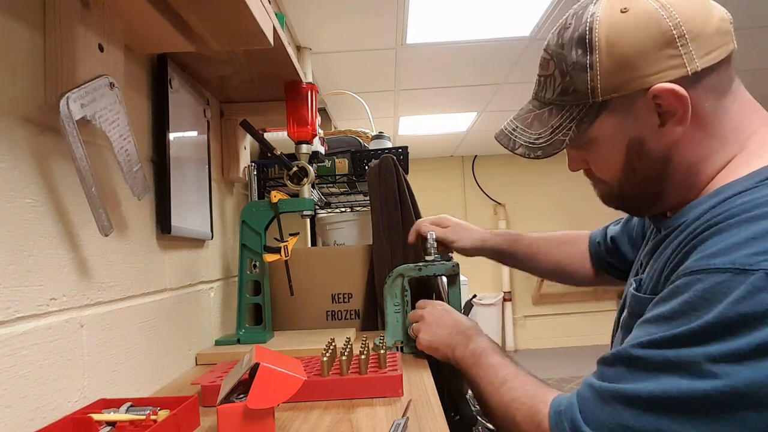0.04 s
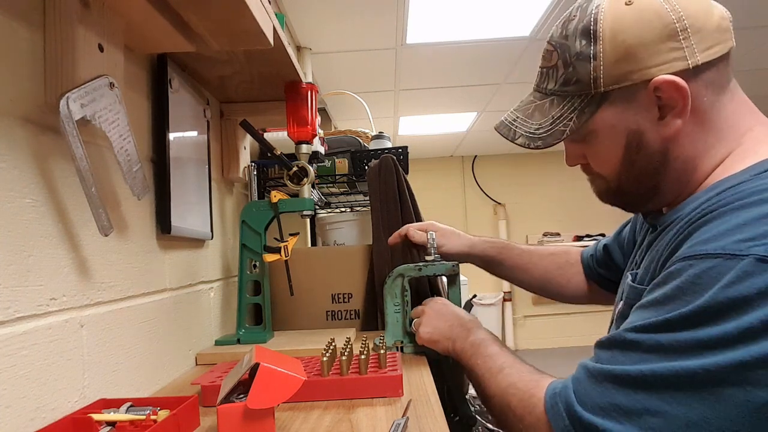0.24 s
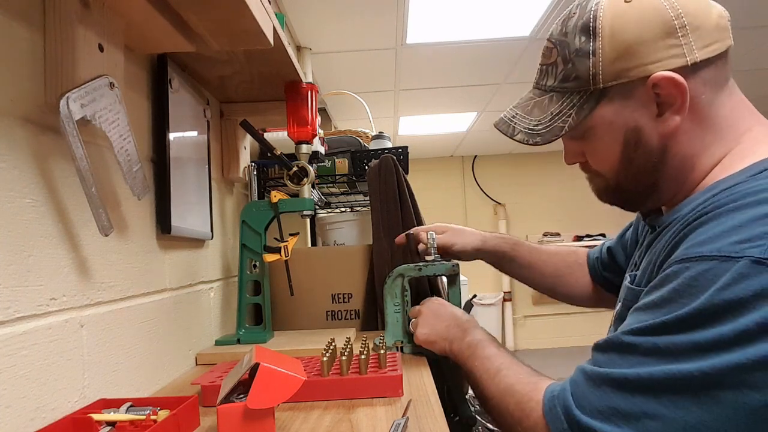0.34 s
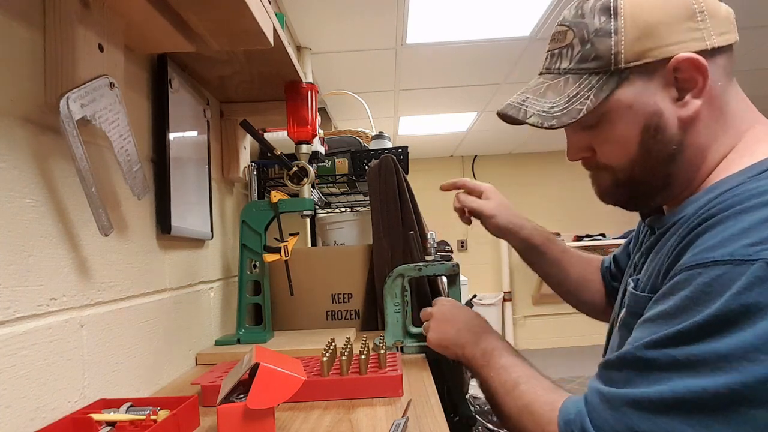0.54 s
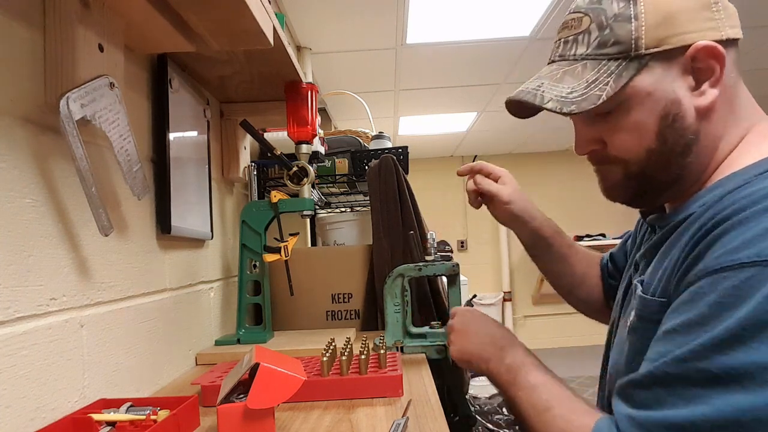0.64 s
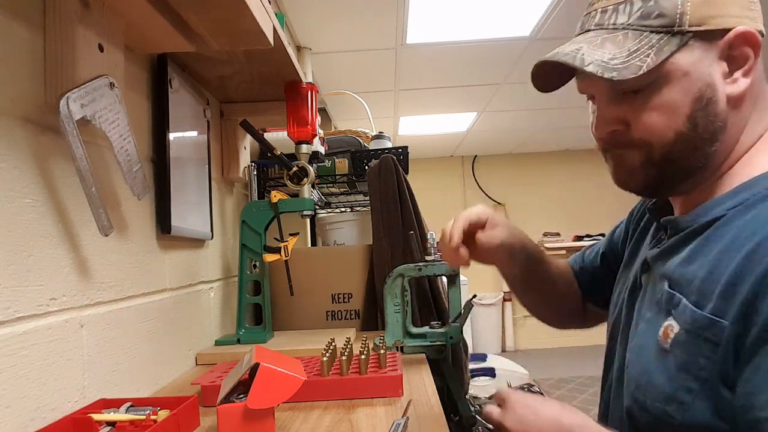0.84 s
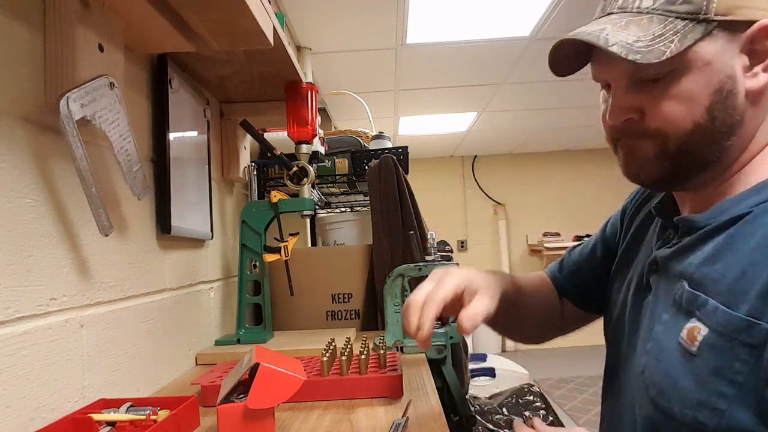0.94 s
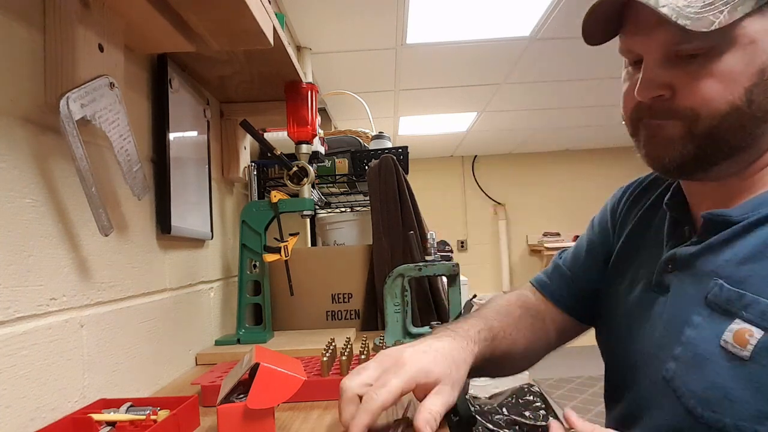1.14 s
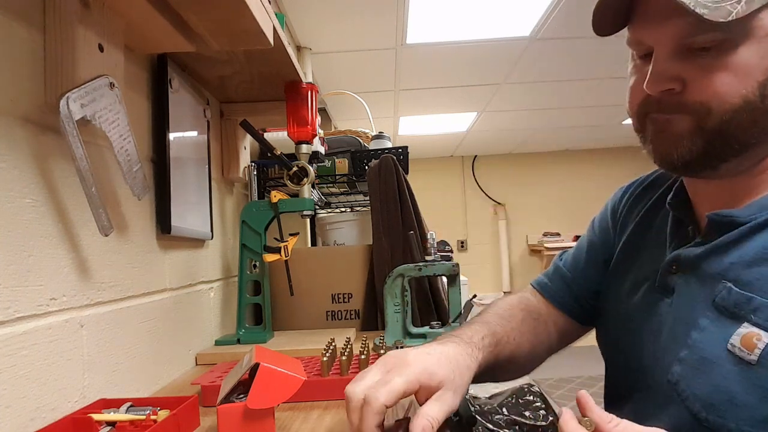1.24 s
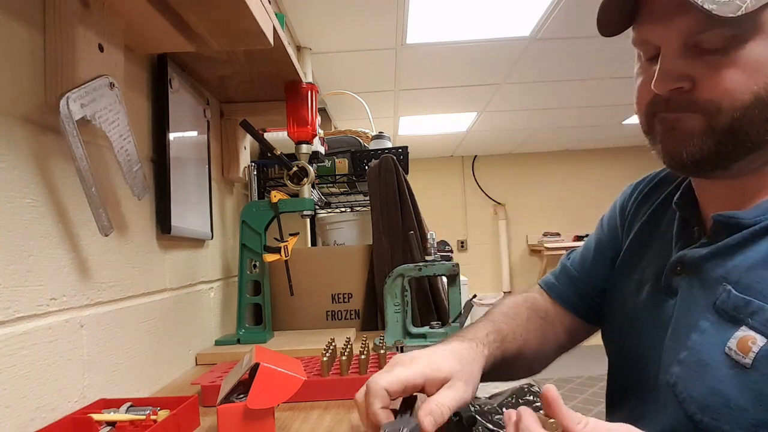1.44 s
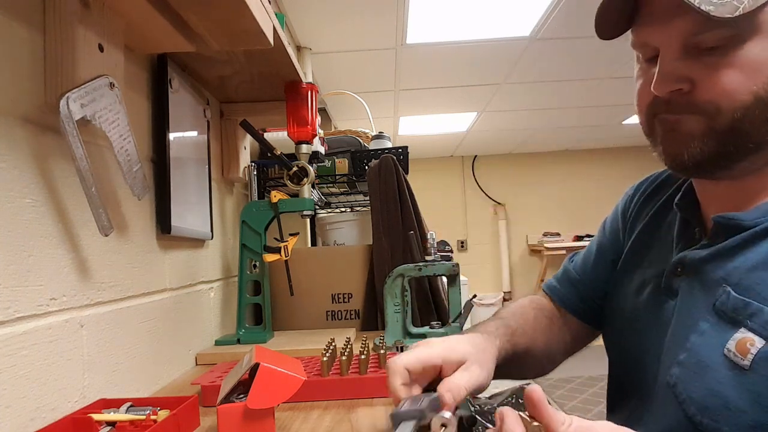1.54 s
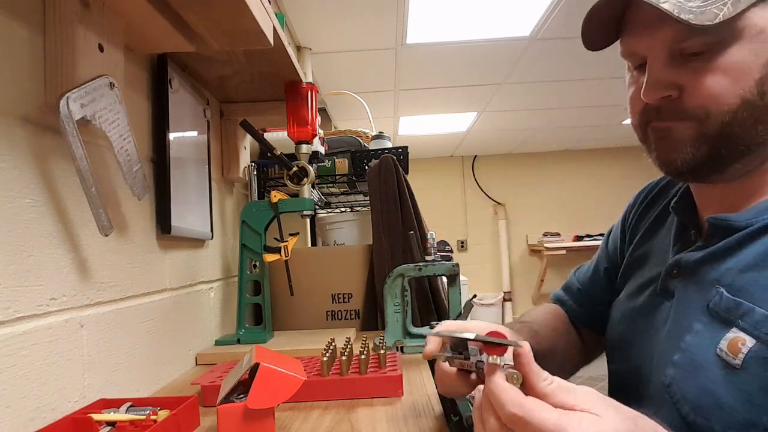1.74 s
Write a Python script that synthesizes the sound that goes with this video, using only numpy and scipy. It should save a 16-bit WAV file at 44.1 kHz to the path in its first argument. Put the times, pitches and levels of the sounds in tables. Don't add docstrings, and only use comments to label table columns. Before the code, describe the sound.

A cast-iron hand press on a wooden bench creaks briefly, clunks loudly on its stop and rattles loosely; a second later a steel tool is dragged and knocked off the wood, in a small hard room, close stereo microphone.

```python
import sys
import numpy as np
from scipy import signal
from scipy.fft import rfft, irfft, next_fast_len
from scipy.io import wavfile
from scipy.ndimage import uniform_filter1d, map_coordinates

SR = 44100
rng = np.random.default_rng(int(sys.argv[2]) if len(sys.argv) > 2 else 0)


def to_linear_factor(level_db):
    exponent = np.asarray(level_db, float) / 20
    return 10 ** exponent


def generate_wav(sig):
    pcm = np.round(np.clip(np.atleast_2d(sig).T, -1, 1) * 32767).astype(np.int16)
    wavfile.write(sys.argv[1], SR, pcm)


N = 79380

# pitch in Hz, level in dB.
HUM_LINES = [(59.2, -56.5), (91.5, -63), (183.0, -66), (269.2, -66.5)]
# frequency in Hz, level per Hz in dB.
AIR_COLOUR = [(15, -68), (25, -30), (70, -6.5), (134, -10), (285, -9), (489, -13), (988, -16),
              (1610, -23.5), (16000, -39)]
# frequency in Hz, likeness from -1 to 1.
AIR_ALIKE = [(60, 1), (240, 0.69), (950, -0.18), (3770, 0.07), (15000, 0.59)]
# frequency in Hz, time to fall by 60 dB in seconds.
ROOM_DECAY = [(150, 0.27), (1000, 0.2), (4000, 0.37), (12000, 0.17)]

# pitch in Hz, width in Hz, level in dB.
BENCH_TONES = [(93.1, 2.8, -2), (150, 9.2, -19), (170, 40, 3), (237.5, 40, 5), (327, 78, -25),
               (400, 5.4, -20)]
# time in seconds, level in dB, contact in ms.
THUMPS = [(.2148, -6.5, 3.35), (.2205, 3, 4.18), (.2335, -2.5, 1.9), (.242, -8, 1.78), (.256, -4.5, 3.8),
          (.343, -10.5, 7.2), (1.204, -22, 5.3), (1.224, -22.5, 5.1), (1.282, -27, 2.7),
          (1.300, -21.5, 5.3), (1.364, -31, 2), (1.428, -21.5, 1.52), (1.472, -14.5, 2.6),
          (1.499, -33.5, 1.4), (1.510, -24.5, 0.56)]
# start in seconds, length in seconds, level in dB, pitch in Hz.
GROAN = [(0, 0.029, -37, 231.3), (.036, 0.025, -40.5, 210.3), (.06, 0.03, -48, 195.6),
         (.09, 0.011, -45.5, 173.5), (.117, 0.011, -39.5, 170), (.143, 0.013, -41, 166),
         (.165, .011, -45.5, 163), (.195, 0.015, -41.5, 170)]
# time in seconds, level in dB.
SETTLE = [(.26, -34), (.3, -47.5), (.39, -50.5), (.43, -41.5), (.5, -56), (.6, -58)]
# time in seconds, level in dB.
DRAG = [(1.424, -42), (1.432, -33), (1.447, -41), (1.457, -30), (1.466, -39), (1.5, -23), (1.515, -21),
        (1.53, -30), (1.59, -66)]
# pitch in Hz, width in Hz, level in dB.
GROAN_WOOD = [(203, 110, 5.5), (413, 37, -2), (610, 100, -6.5)]
SETTLE_WOOD = [(223, 110, 3), (402, 54, -5.0), (602, 180, -4.5)]
DRAG_WOOD = [(132, 77, -1.5), (418.5, 64, 2.5), (590, 42, 3.0)]

# pitch in Hz, width in Hz, level in dB.
JAW_TONES = [(1300, 45, 4), (1710, 28, -8), (3030, 33, 0), (5830, 27, -2)]
# frequency in Hz, level in dB.
JAW_CROWD = [(700, -13), (3200, -23.5), (6000, -30), (10000, -40)]
# start in seconds, length in seconds, level in dB.
JAW_RATTLES = [
    (1.362, 0.035, -49.5),
    (1.404, .014, -57),
    (1.452, 0.041, -54),
]
# pitch in Hz, width in Hz, level in dB.
BEAM_TONES = [(578.5, 35, 9), (1123, 250, 10.5), (1900, 24, -19)]
# frequency in Hz, level in dB.
BEAM_CROWD = [(400, -11.5), (1300, -8), (4000, -20.5), (8000, -23.5), (15000, -32)]
# time in seconds, level in dB, contact in ms.
KNOCKS = [(1.4275, -37, 0.38), (1.438, -37, .5), (1.4735, -24, 0.58), (1.4988, -10.5, 0.18),
          (1.5025, -14, 0.18), (1.5075, -21, 0.12), (1.5155, -14.5, 0.18)]
# pitch in Hz, width in Hz, level in dB.
TING_TONES = [(1300, 60, -3), (2960, 65, 0), (3280, 120, -14), (5750, 90, -8), (7900, 150, -22),
              (8689, 120, -21)]
# time in seconds, level in dB, contact in ms.
TINGS = [(1.3615, -35, .1), (1.364, -56, 0.076), (1.367, -37, 0.031), (1.3716, -31, 0.13),
         (1.381, -41, 0.053), (1.403, -52, .04), (1.411, -42, 0.069), (1.418, -51, 0.034),
         (1.4539, -46, .02)]
# pitch in Hz, width in Hz, level in dB.
TRAY_TONES = [(680, 140, 6), (1830, 97, 2), (3460, 51, 5), (4200, 230, -1)]
# frequency in Hz, level in dB.
TRAY_CROWD = [(300, -21), (1000, -8.5), (2500, -12), (5000, -24), (8000, -26)]
# start in seconds, length in seconds, level in dB.
TRAY_RATTLES = [(1.261, 0.011, -53), (1.272, 0.0077, -49), (1.284, 0.012, -45), (1.305, 0.016, -56.5)]
# pitch in Hz, width in Hz, level in dB.
SLIDE_TONES = [(2980, 95, 3), (4950, 100, -3), (5950, 32, -3), (6830, 63, -7), (8170, 52, 9),
               (8880, 170, 7)]
# frequency in Hz, level in dB.
SLIDE_CROWD = [(1500, -23), (5500, -14), (8800, -6.5), (9600, -16), (14000, -16), (15600, -32)]
# time in seconds, level in dB, contact in ms.
CLICKS = [(1.5025, -24, 0.047), (1.5168, -16.5, 0.021), (1.5325, -18.5, 0.072), (1.541, -24, 0.052)]
# start in seconds, length in seconds, level in dB.
SLIDE_RATTLES = [(1.364, 0.034, -65), (1.404, 0.039, -65), (1.453, 0.0033, -59), (1.518, 0.0061, -35.5),
                 (1.532, .014, -40), (1.572, 0.058, -66), (1.752, 0.012, -61.5)]

# pitch in Hz, width in Hz, level in dB.
PIN_TONES = [(2150, 150, 5), (4300, 200, 3), (2750, 200, -6)]
# time in seconds, level in dB, contact in ms.
SLIPS = [(.0005, -40, .05), (.013, -55, 0.2), (.018, -46, 0.06), (.024, -48, 0.054), (.042, -51, 0.055),
         (.052, -64, 0.048), (.060, -51, 0.036), (.0707, -43, 0.037), (.0765, -51, 0.067),
         (.0892, -43, 0.036), (.111, -56, .15), (.1266, -47.5, 0.068), (.1461, -47, 0.19),
         (.1735, -57, 0.13)]
# start in seconds, length in seconds, level in dB.
PIN_RATTLES = [(0, .09, -68)]
# pitch in Hz, width in Hz, level in dB.
IRON_TONES = [(660, 44, 6), (884, 90, 15.5), (1040, 64, 13), (1374, 26, 9.5), (2185, 250, 7)]
# frequency in Hz, level in dB.
IRON_CROWD = [(350, 3), (1200, -9.5), (2300, -9.5), (5000, -15.5), (9500, -20)]
# time in seconds, level in dB, contact in ms.
CLUNKS = [(.2128, -15, 0.25), (.2152, -9.5, 0.39), (.2205, -12.5, 0.11), (.2335, -16.5, 0.29),
          (.2365, -18.5, 0.17), (.247, -34, 0.96), (.2575, -27.5, 0.18)]
# start in seconds, length in seconds, level in dB.
FRAME_RATTLES = [(.2135, 0.0035, -33), (.219, 0.015, -39.5), (.234, 0.0033, -37.5), (.248, 0.019, -51)]
# frequency in Hz, level in dB.
SNAP_CROWD = [(1800, 5), (4000, -6.5), (8000, -11), (11000, -10), (16000, -34)]
# time in seconds, level in dB, contact in ms.
SNAPS = [(.2331, -25, .02), (.2345, -29, .02), (.2365, -29, .03), (.2555, -42, .05)]
# start in seconds, length in seconds, level in dB.
SNAP_RATTLES = [
    (0, 0.086, -58.5),
    (.09, 0.13, -67),
    (.2332, 0.0044, -42),
]
# pitch in Hz, width in Hz, level in dB.
LINK_TONES = [(1402, 28, -6), (2017, 83, 3), (2293, 86, 0.5), (2970, 57, 0.5), (3400, 43, -12.5),
              (4340, 50, -1), (7100, 140, -13)]
# frequency in Hz, level in dB.
LINK_CROWD = [(600, -16), (1400, -31), (2400, -15.5), (4300, -17), (5000, -23.5), (10000, -34)]
# time in seconds, level in dB, contact in ms.
LINK_TICKS = [(.3248, -33, .04), (.328, -39, 0.032), (.3365, -36, 0.075), (.345, -50, .1),
              (.4136, -46, .04), (.418, -36, 0.058), (.4311, -51, 0.046), (.464, -40, 0.19),
              (.473, -45, .22), (.484, -54, 0.22), (.5064, -28, 0.37), (.5248, -53, 0.38), (.536, -47, .22)]
# start in seconds, length in seconds, level in dB.
LINK_RATTLES = [(.325, 0.014, -46), (.414, 0.028, -53.5)]
# start in seconds, length in seconds, level in dB.
LINK_SCRAPES = [(.36, 0.015, -65), (.463, 0.021, -47.5), (.5, .012, -51.5), (.522, 0.018, -50.5)]


def unit(x):
    return x / np.sqrt(np.mean(x ** 2) + 1e-20)


def along(points, hz):
    f, value = np.transpose(points)
    return np.interp(np.log(hz + 1), np.log(f + 1), value)


def stroke(rows):
    s, db = np.transpose(rows)
    return to_linear_factor(np.interp(np.arange(N) / SR, s, db, -120, -120))


def wander(points_per_s, count=400):
    return map_coordinates(rng.standard_normal(count), [np.arange(N) / SR * points_per_s])


def filtered(x, response):
    m = next_fast_len(N + SR // 2)
    hz = np.fft.rfftfreq(m, 1 / SR)
    return irfft(rfft(x, m) * response(hz), m)[..., :N]


def dulled(x, hz):
    return filtered(x, lambda f: (1 / (1 + 1.4j * f / hz - (f / hz) ** 2)) ** 2)


def placed(x, pan_db, lag_s):
    side = np.array([[1], [-1]])
    return filtered(x * to_linear_factor(pan_db / 2 * side), lambda f: np.exp(-1j * np.pi * f * lag_s * side))


def ring(modes, spread_db, crowd=None, loss=0.03, count=240, rise_s=1e-6):
    hz, width, db = np.transpose(modes)
    phase = np.zeros((2, len(hz)))
    if crowd:
        f = np.exp(rng.uniform(*np.log([crowd[0][0], crowd[-1][0]]), count))
        hz = np.r_[hz, f]
        width = np.r_[width, loss * f + 45]
        db = np.r_[db, along(crowd, f) + rng.normal(0, 3, count)]
        crowd_phase = rng.normal(0, .8, (2, count)) + rng.uniform(0, 2 * np.pi, count)
        phase = np.c_[phase, crowd_phase]
    t = np.arange(SR // 16 if crowd else SR // 8)[:, None, None] / SR
    left_right_db = np.outer([1, -1], min(spread_db, 3) * rng.standard_normal(len(hz)))
    size = to_linear_factor(db + left_right_db) * width
    fade = np.exp(-np.pi * width * t) * (1 - np.exp(-t / rise_s))
    return (size * fade * np.sin(2 * np.pi * hz * t + phase)).sum(2).T


def body(force, tick, order):
    answer = tick / np.linalg.norm(tick, order, axis=1).mean()
    return signal.fftconvolve(force[None], answer, axes=1)[:, :N]


def blows(rows):
    t = np.arange(N) / SR
    force = np.zeros(N)
    for s, db, ms in rows:
        pulse = np.exp(-.5 * ((t - s - ms / 2000) / (ms / 4000 + 1e-6)) ** 2)
        force += to_linear_factor(db) * pulse / pulse.sum()
    return force


def struck(rows, tick):
    return body(blows(rows), tick, np.inf)


def rattle(rows, tick, tail_s=.012):
    grains_per_s, grain_spread_db, edge_s = 6000, 2.5, .002
    t = np.arange(N) / SR
    hits = rng.random(N) < grains_per_s / SR
    grains = hits * to_linear_factor(grain_spread_db * rng.exponential(size=N)) * rng.standard_normal(N)
    shape = np.zeros(N)
    for s, length, db in rows:
        fade_db = -60 * np.clip(t - s - length, 0, 1) / tail_s
        shape += to_linear_factor(db + fade_db) * np.clip(4 * (t - s) / edge_s + .5, 0, 1)
    return body(unit(grains) * shape, tick, order=2)


def rub(gain, modes):
    return body(gain * rng.standard_normal(N), ring(modes, spread_db=0), order=2)


def air():
    z = signal.stft(rng.standard_normal((2, N + 512)), nperseg=512)[2]
    patches = uniform_filter1d(uniform_filter1d(rng.standard_normal(z.shape[1:]), 6, 0), 12, 1)
    pair = signal.istft(z * to_linear_factor(0.15 * unit(patches)), nperseg=512)[1][:, :N]

    def colour(hz):
        angle = np.arccos(np.clip(along(AIR_ALIKE, hz), -1, 1)) / 2
        return to_linear_factor(along(AIR_COLOUR, hz)) * np.array([np.cos(angle), np.sin(angle)])

    mid, side = filtered(pair, colour)
    noise = np.array([mid + side, mid - side]) * to_linear_factor(-56) / np.std(mid)
    t = np.arange(N) / SR
    hum = np.zeros(N)
    for hz, db in HUM_LINES:
        level = to_linear_factor(db + 4.5 + 0.74 * wander(6, 20))
        hum += level * np.sin(2 * np.pi * hz * t + 1.1 * wander(6, 20))
    return placed(noise + hum, -1.8, -0.00011)


def room(x):
    hz, t, z = signal.stft(rng.standard_normal((2, SR // 2)), SR, nperseg=256)
    z = z[:1] + np.clip(hz / 900, .25, 1)[:, None] * (z - z[:1])
    fade = to_linear_factor(-60 * t / along(ROOM_DECAY, hz)[:, None])
    tail = signal.istft(z * fade, SR, nperseg=256)[1]
    late = np.pad(x.mean(0), (130, 0))[None]
    return signal.fftconvolve(late, tail / np.linalg.norm(tail[0]), axes=1)[:, :N]


def lever_groan():
    edge_s = 0.0071
    t = np.arange(N) / SR
    load = np.zeros(N)
    for s, length, db, hz in GROAN:
        load += to_linear_factor(db) * np.clip(np.minimum(t - s, s + length - t) / edge_s + 1, 0, 1)
    middles = [s + length / 2 for s, length, db, hz in GROAN]
    judder_hz = np.interp(t, middles, [hz for s, length, db, hz in GROAN])
    turns = 2 * np.pi * np.cumsum(judder_hz * (1 + 0.076 * wander(57.6))) / SR
    judder = load * to_linear_factor(3.5 + 0.88 * wander(61.0)) * np.sin(turns)
    return judder + rub(load * to_linear_factor(-9), GROAN_WOOD)


def caliper_drag():
    pull = stroke(DRAG)
    turns = 2 * np.pi * np.cumsum(212 * (1 + 0.1178 * wander(70))) / SR
    judder = pull * to_linear_factor(1.0 + 1.3 * wander(51.7)) * np.sin(turns)
    return judder + rub(pull * to_linear_factor(-5), DRAG_WOOD)


def bench():
    thumps = struck(THUMPS, ring(BENCH_TONES, spread_db=.4))
    settle = rub(stroke(SETTLE), SETTLE_WOOD)
    top = thumps + lever_groan() + settle + caliper_drag()
    top = filtered(top, lambda hz: (1j * hz / (70 + 1j * hz)) ** 4)
    return placed(top, -5.5, .00004)


def caliper():
    wood = rattle(JAW_RATTLES, ring(JAW_TONES, 6, JAW_CROWD), tail_s=0.025)
    wood = wood + struck(KNOCKS, ring(BEAM_TONES, 5.1, BEAM_CROWD))
    wood = wood + struck(TINGS, ring(TING_TONES, 1, rise_s=0.0012))
    wood = wood + rattle(TRAY_RATTLES, ring(TRAY_TONES, 5.5, TRAY_CROWD), tail_s=0.026)
    tick = ring(SLIDE_TONES, 2.4, SLIDE_CROWD, loss=0.029)
    slide = struck(CLICKS, tick) + rattle(SLIDE_RATTLES, tick, tail_s=.045)
    return placed(wood, -4.0, 0.00024) + placed(slide, -6.5, -0.000015)


def press():
    pin = ring(PIN_TONES, 4.9, rise_s=0.00086)
    slips = struck(SLIPS, pin) + rattle(PIN_RATTLES, pin)

    stop = struck(CLUNKS, ring(IRON_TONES, 3.6, IRON_CROWD, loss=0.011))
    frame = ring(IRON_TONES[-1:], 3.8, IRON_CROWD, loss=0.051)
    stop = dulled(stop + rattle(FRAME_RATTLES, frame, tail_s=0.071), hz=8100)

    snap = ring(IRON_TONES[-1:], 2, SNAP_CROWD, loss=0.02)
    ram = struck(SNAPS, snap) + rattle(SNAP_RATTLES, snap, tail_s=0.15)

    link = ring(LINK_TONES, 3.8, LINK_CROWD, loss=0.0074)
    links = struck(LINK_TICKS, link) + rattle(LINK_RATTLES, link, tail_s=0.05)
    links = links + dulled(rattle(LINK_SCRAPES, link, tail_s=.02), hz=4200)
    return placed(slips + stop + ram + links, -6.0, 0.00014)


def scene():
    wood, iron, steel = bench(), press(), caliper()
    echoes = to_linear_factor(-10) * room(wood) + to_linear_factor(-10) * room(iron) + to_linear_factor(-15) * room(steel)
    return air() + wood + iron + steel + echoes


def roll_off(x):
    return signal.sosfilt(signal.butter(12, 16220, fs=SR, output="sos"), x)


def record(dry):
    top_hz, bass_hz = 16220, 45
    mix = filtered(dry, lambda hz: (hz < top_hz) * (1j * hz / (bass_hz + 1j * hz)) ** 2)
    return roll_off(mix)


dry = scene()
out = record(dry)
generate_wav(out)
```